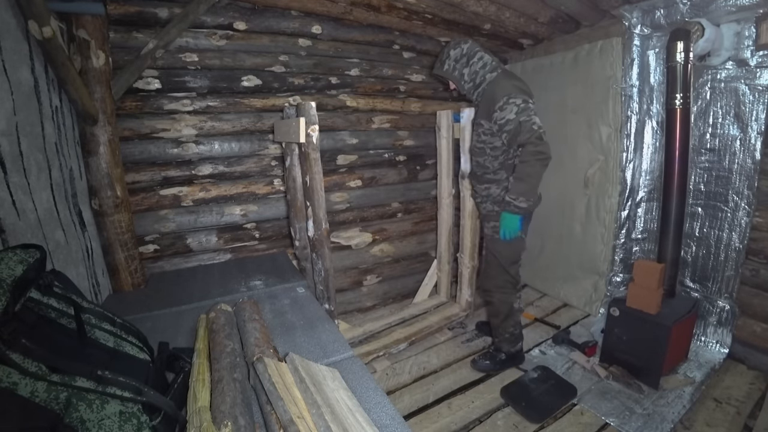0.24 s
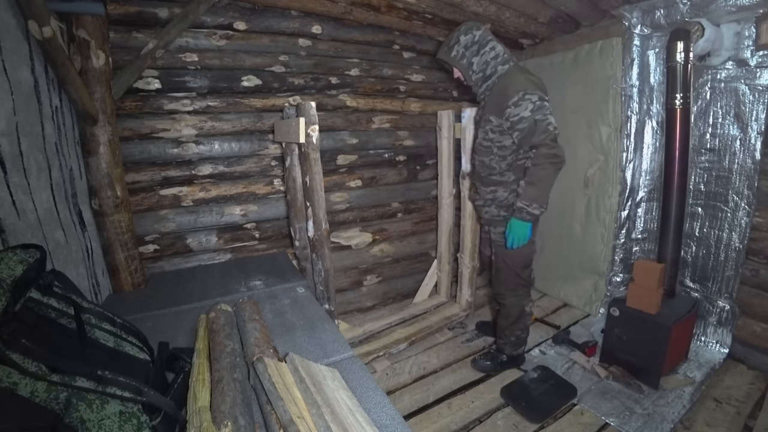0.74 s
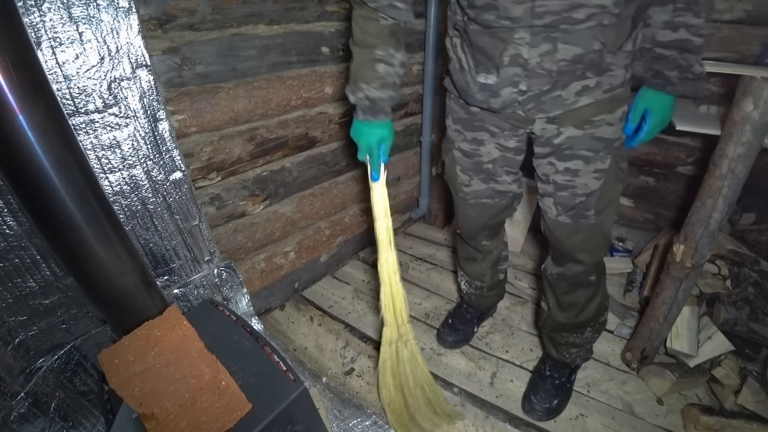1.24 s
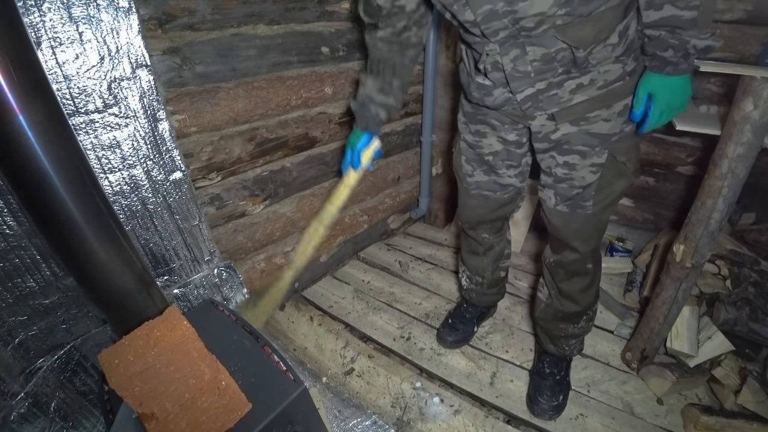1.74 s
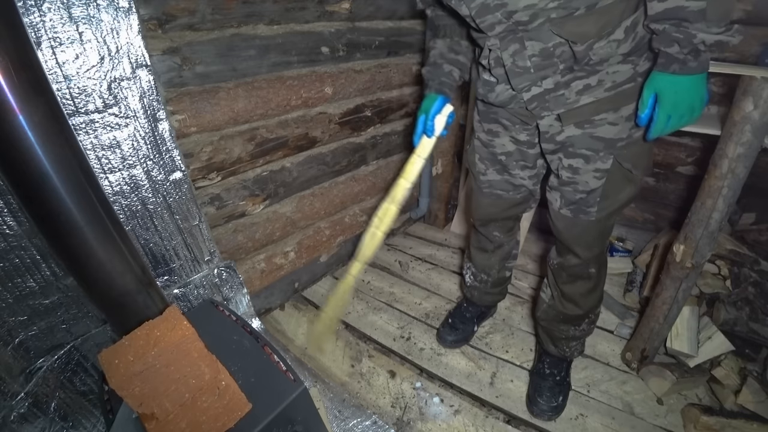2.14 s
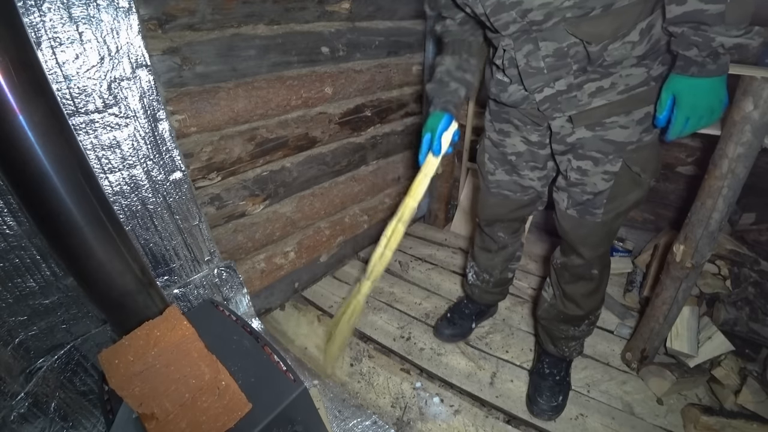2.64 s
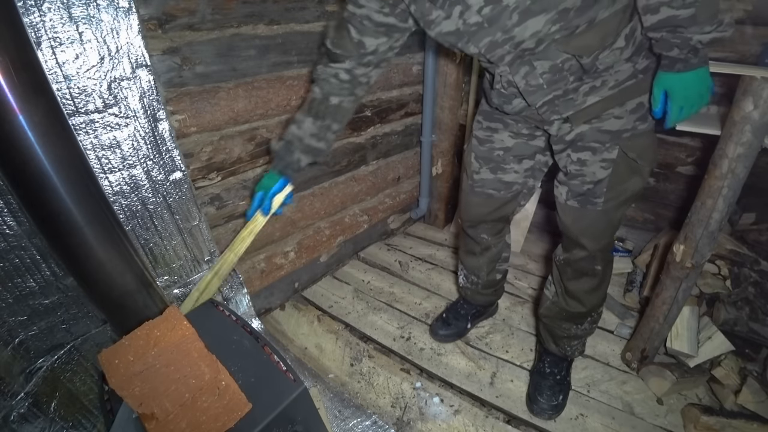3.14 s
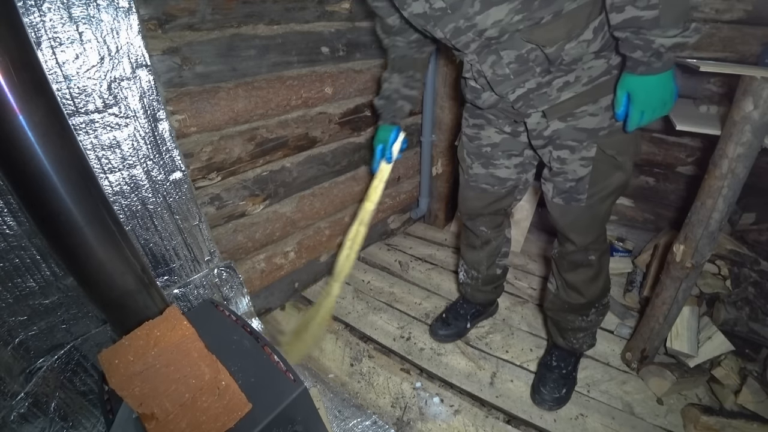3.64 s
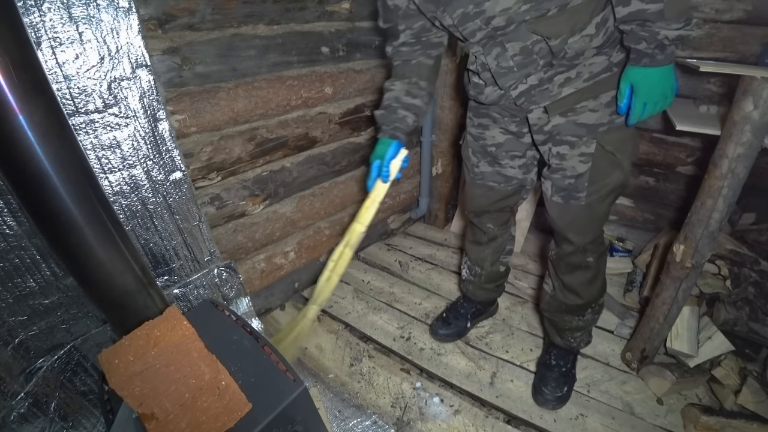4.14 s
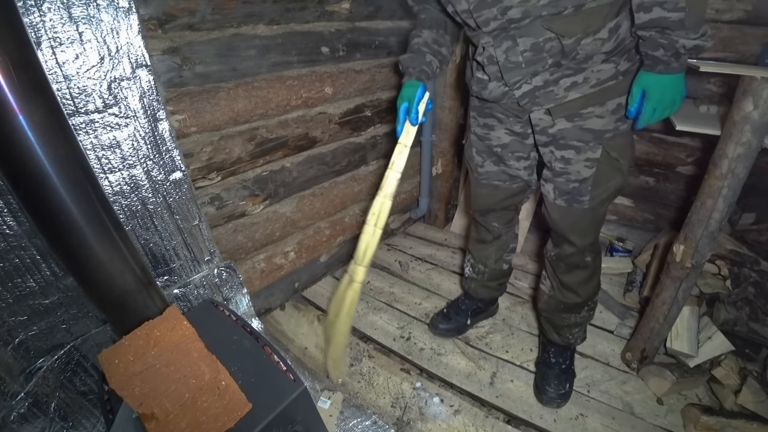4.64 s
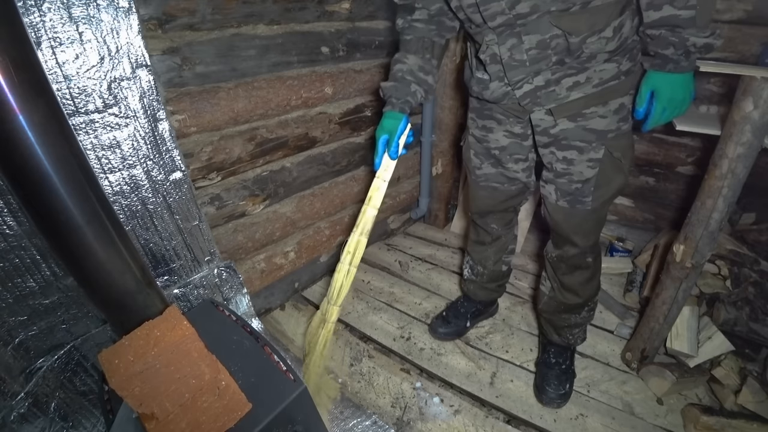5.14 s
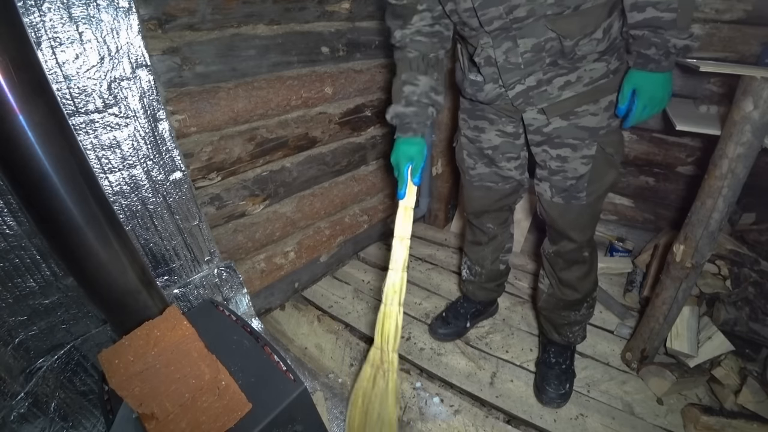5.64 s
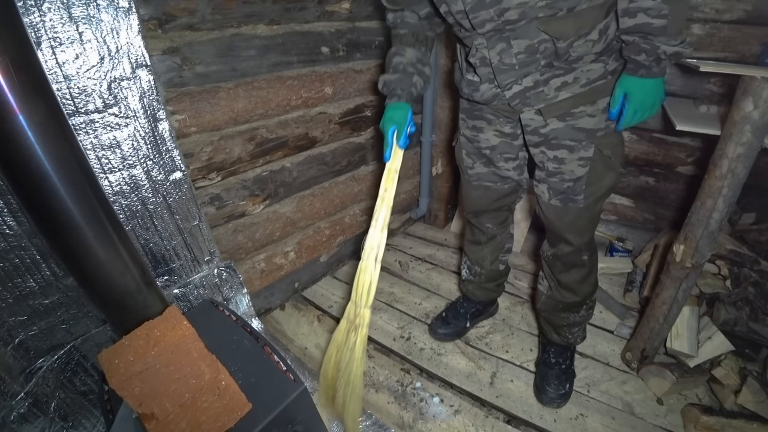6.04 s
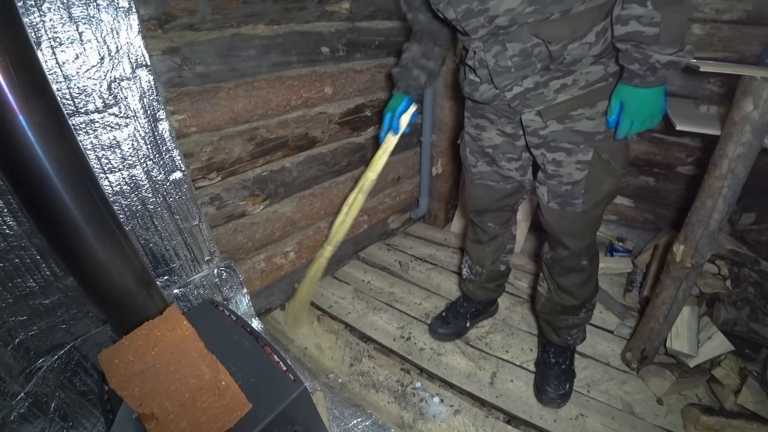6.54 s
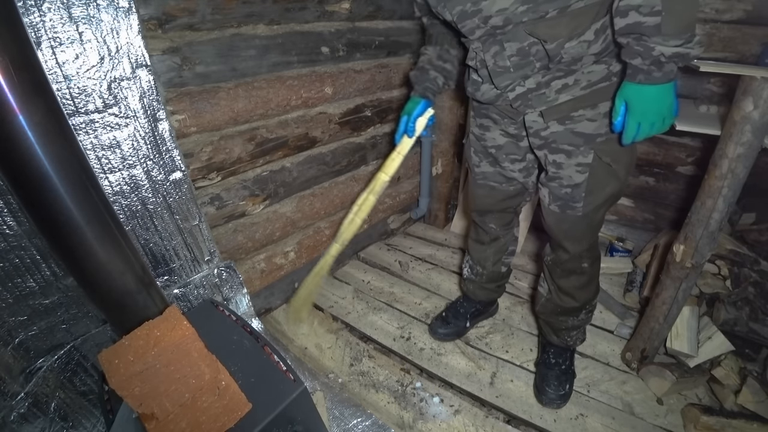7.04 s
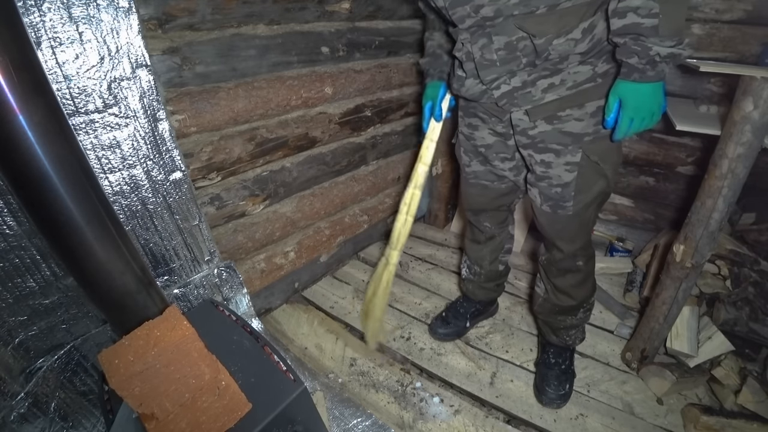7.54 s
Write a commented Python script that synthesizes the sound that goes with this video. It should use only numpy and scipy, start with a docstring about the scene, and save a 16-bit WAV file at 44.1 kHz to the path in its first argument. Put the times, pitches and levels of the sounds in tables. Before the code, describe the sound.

Two dull tray knocks and a boot scuff on planks, then brisk straw broom strokes with small snaps in a quiet log room.

```python
"""In a small log room with a plank floor, over a quiet hush, a boot shoves a tray that knocks twice on the boards.
Then a straw broom sweeps in short strokes; near the end a wood chip is dragged along.
Boot and broom drags are a rain of tiny random slips, heard through straw tips, stalks, dust and rumbling planks.
Thumps and snaps are short dying tones, snaps with a noisy flick; the tray and the chip are sets of ringing
tones, set off by blows or by slips. The walls add a short tail of scattered echoes."""
import sys
import numpy as np
from scipy import signal
from scipy.fft import rfft, irfft
from scipy.io import wavfile

SR = 44100
rng = np.random.default_rng(int(sys.argv[2]) if len(sys.argv) > 2 else 0)


def magnitude_from_level(level_db):
    """Linear magnitude for a level in decibels (20 dB per decade)."""
    exponent = np.asarray(level_db, float) / 20
    return 10 ** exponent


def transcribe(signal):
    """Save signal, clipped to [-1, 1], as a 16-bit WAV file at the path in sys.argv[1]."""
    frames = np.atleast_2d(signal).T
    limited = np.clip(frames, -1, 1)
    pcm = np.round(limited * 32767).astype(np.int16)
    wavfile.write(sys.argv[1], SR, pcm)


N = 343539   # length in samples
BINS_HZ = np.maximum(np.fft.rfftfreq(N, 1 / SR), 1)

# All levels in the tables are relative.
# Tone of the quiet room and the microphone's own noise: (frequency [Hz], level [dB])
HUSH_TONE = [(25, -14.5), (58, -1.5), (130, -9), (250, -1.5), (600, -5), (1500, -8.5), (3300, -10),
             (4600, -6.5), (6300, -16.5), (6900, -11), (8000, -15), (12600, -26), (12900, -46),
             (15600, -57)]
# How alike the hush is on the left and the right: (frequency [Hz], likeness [-1 to 1])
HUSH_LIKENESS = [(60, 0.72), (180, -0.19), (550, -0.49), (1650, -0.49), (4970, 0.34), (15000, 0.57)]
# One list per drag over the boards, first the boot, then the broom:
# (time [s], swish level [dB], pressure as thick-stem level against the swish [dB])
DRAGS = [
    [(0.0, -47.5, 1), (0.14, -40, -5), (0.176, -53, -2.5), (0.19, -42, -3), (0.215, -45.5, -2.5)],
    [(0.3, -62, 8.5), (0.344, -74, 5.5), (0.44, -74, -10.5), (0.465, -62, 7)],
    [(0.55, -54.5, -1), (0.61, -66.5, -8), (0.638, -61, -6.5), (0.7, -99, -7.5)],
    [(0.942, -40.5, -33.5), (0.982, -37, -26.5), (1.046, -34.5, -30.5), (1.078, -36, -8.5),
     (1.168, -31.5, -20.5), (1.172, -28, -18.5), (1.252, -37.5, -8), (1.3, -45.5, -16),
     (1.464, -56.5, -6.5), (1.512, -64.5, -12), (1.67, -62.5, -27), (1.682, -47.5, -21), (1.73, -61, -28)],
    [(1.739, -40.5, -27.5), (1.773, -30, -13.5), (1.895, -27, -17), (1.955, -31, -14), (2.023, -28.5, -23),
     (2.089, -44, -15), (2.233, -58.5, -20.5), (2.32, -84.5, -14.5)],
    [(2.33, -73.5, -16.5), (2.398, -44, -21.5), (2.438, -36, -13.5), (2.492, -24.5, -20.5),
     (2.546, -27, -13.5), (2.6, -28.5, -13), (2.802, -59.5, -16.5), (2.822, -53, -19), (2.93, -91, 3)],
    [(2.945, -64, -17), (2.949, -54.5, -26.5), (2.99, -65, -16)],
    [(3.0, -62.5, -5), (3.028, -40, -18.5), (3.112, -42.5, -10), (3.176, -49, -13.5), (3.198, -61, -2),
     (3.222, -47.5, -14), (3.25, -58.5, -7), (3.264, -47, -3), (3.328, -33, -9.5), (3.34, -33.5, -6),
     (3.53, -27.5, -12), (3.612, -32.5, -19), (3.702, -26.5, -20), (3.726, -25.5, -23), (3.792, -39.5, -19),
     (3.892, -62, -38), (3.93, -89.5, -10)],
    [(4.043, -43.5, -11), (4.073, -28, -16.5), (4.105, -34.5, -10), (4.117, -39, -14.5),
     (4.157, -24.5, -17), (4.367, -34, -9), (4.445, -42, -8), (4.56, -82, -9)],
    [(4.93, -92, -0.5), (4.944, -60, -23), (4.988, -44, -24), (5.04, -38.5, 0), (5.194, -57.5, -6.5),
     (5.218, -47.5, -34), (5.228, -52.5, -20), (5.276, -40, -18.5), (5.486, -88.5, -17.5), (5.5, -85, -11)],
    [(5.638, -45.5, -9.5), (5.642, -38, -9), (5.724, -25, -9.5), (5.838, -25, -16.5), (5.904, -49, -17),
     (5.96, -54.5, -33.5), (6.05, -78, -21.5)],
    [(6.095, -60.5, -6), (6.121, -37.5, -10.5), (6.173, -37.5, -11.5), (6.191, -29, -10.5),
     (6.213, -37.5, -7.5), (6.307, -30.5, -17.5), (6.413, -64, -20), (6.5, -99, -5)],
    [(6.62, -74, -26), (6.652, -47, -7.5), (6.694, -38, -14.5), (6.714, -43, -4), (6.768, -38.5, -23.5),
     (6.862, -37, -4), (7.008, -49.5, -9.5), (7.066, -64, -13.5), (7.102, -59, -16.5), (7.146, -89.5, 19.5),
     (7.18, -97.5, 3)],
    [(7.2, -74, -4), (7.222, -60, -18.5), (7.306, -36, -29.5), (7.474, -35, -6.5), (7.518, -35.5, -10),
     (7.56, -48.5, -11), (7.64, -56.5, -8), (7.758, -60, -15), (7.79, -70, -14)],
]
# What each drag runs over, in the same order:
# (hollow planks [dB], roughness that shakes the stalks [dB], dust [dB])
GROUND = [(0.5, -2.5, 1), (4, -0.5, -4), (1.5, -4, -8.5), (-0.5, 2, 3.5), (0, -0.5, 2), (-1.5, 1, 1),
          (-4, -6, -11), (1.5, 1, -0.5), (-1.5, -0.5, -2), (-5, 1.5, 2), (-10.5, 2, 1), (-18.5, 3.5, 1.5),
          (1.5, -5, 5.5), (-2.5, -3, 3.5)]
# Tone of straw over boards: (frequency [Hz], level [dB])
SWEEP_TONE = [(40, -41.5), (150, -18.5), (300, -4), (450, -16.5), (700, -16), (1500, -12), (2600, -7),
              (3400, -9.5), (3700, -17.5), (4200, -12), (5200, -13.5), (6300, -17.5), (8200, -14),
              (10500, -19.5), (13000, -30), (15600, -37.5)]
# Tones of the floor planks: (frequency [Hz], damping [Hz], level [dB])
PLANK_MODES = [(178, 40, -7.5), (204, 86, 10), (350, 62, 7), (532, 270, 7), (683, 330, -6.5)]
# Boards thumped by boot, tray and broom; the lowest when weight shifts on them:
# (time [s], level [dB], pitch [Hz])
THUMPS = [(0.056, -30, 263), (0.081, -24.5, 265.5), (0.102, -33, 280), (0.125, -37, 271),
          (0.187, -28.5, 267), (0.05, -62.5, 55.6), (0.241, -19, 274), (0.25, -48, 70.3), (1.2, -66, 75),
          (1.78, -64, 80), (2.43, -66, 75), (3.17, -58, 69.9), (3.28, -59.5, 55), (3.4, -56.5, 80.4),
          (3.52, -66.5, 60.2), (5.645, -59.5, 60), (6.95, -68, 75), (0.261, -23.5, 250.2),
          (0.325, -38, 278.7), (0.501, -37.5, 244), (3.498, -32, 229), (3.543, -34.5, 183.7),
          (4.05, -36.5, 528), (4.363, -33.5, 520), (6.655, -45, 190), (6.697, -32.5, 536),
          (6.712, -39, 247), (6.848, -41.5, 184), (7.116, -50.5, 568)]
# The tray's knocks on the boards: (time [s], level [dB])
KNOCKS = [(0.224, -9.5), (0.48, -8)]
# Contacts within each knock, edge first, then the flat blow and rebounds: (time after the blow [s], level [dB])
BOUNCE = [(-.003, -10.5), (0, 0.5), (.007, -8.5), (0.0138, -19), (.07, -42.5)]
# Tones of the tray: (frequency [Hz], level [dB], time to die by 60 dB before extra damping [s])
TRAY_MODES = [(510, -4.5, 0.12), (665, -2.5, 0.15), (734, -1.5, .12), (977, 2.5, 0.17), (1158, 1, .1),
              (1482.5, -4, 0.12), (1216, -7.5, 0.12), (1900, -5, 0.06), (2347, -17.5, 0.21),
              (2600, -10.5, 0.11), (3020, -9, 0.046), (3252, -22, 0.087), (3560, -22.5, 0.11),
              (4400, -15.5, 0.05)]
# Single straws and grit that snap: (time [s], level [dB], pitch [Hz])
SNAPS = [(0.384, -40, 4430), (0.6, -32.5, 4460), (1.1733, -30, 4170), (1.3256, -31, 4650),
         (1.4063, -18, 4640), (1.467, -29, 4100), (1.5429, -33.5, 4530), (1.588, -28.5, 5170),
         (1.63, -38, 4500), (1.6645, -26.5, 4630), (1.675, -26, 2820), (1.6824, -22, 2830),
         (1.6994, -34.5, 3970), (2.337, -25.5, 4300), (2.3754, -39, 4800), (2.8234, -22.5, 4490),
         (2.9514, -35, 4300), (3.002, -25, 1050), (3.024, -18, 5160), (3.036, -18, 2390),
         (3.1044, -17, 2480), (3.13, -17.5, 2990), (3.171, -28, 4500), (3.188, -27, 1660),
         (4.0734, -22, 4730), (4.1385, -24, 4530), (4.1599, -27, 5000), (4.1895, -6.5, 4870),
         (4.2024, -21, 4320), (4.4372, -13.5, 4470), (4.6297, -40.5, 4160), (5.1645, -24.5, 4400),
         (5.2131, -33, 4610), (5.267, -13.5, 4620), (6.05, -42, 4400), (6.0956, -32, 5110),
         (6.584, -38, 4700), (6.6334, -49, 4500), (7.1044, -32.5, 1660), (7.599, -47, 4240),
         (7.628, -24, 6650), (7.66, -26, 4830), (7.7334, -30, 3120), (7.7588, -49.5, 4420)]
# Rise and fall of a chip dragged by the straws: (time [s], level [dB])
CHIP_DRAG = [(6.775, -55), (6.813, -51.5), (6.863, -29.5), (6.915, -41.5), (6.927, -35.5), (6.97, -58.5)]
# Tones of the chip: (frequency [Hz], level [dB], time to die by 60 dB [s])
CHIP_MODES = [(1430, 1, 0.048), (1536, 2.5, 0.037), (1873, 0, 0.014), (2820, -8, 0.019)]
# How far the left microphone port leads the right: (frequency [Hz], phase [radians])
PORT_LEAD = [(60, -.22), (125, -.33), (250, -.48), (500, -.72), (1100, -.75), (2100, -.5), (3800, -.2),
             (6100, .2), (9000, .4), (12500, .8)]


def rms_one(x):
    """Scales a sound to an average strength (rms) of 1."""
    return x / np.sqrt(np.mean(x ** 2) + 1e-20)


def at_hz(points, hz):
    """Reads a curve at any frequency, with straight lines over log frequency."""
    f, v = np.transpose(points)
    return np.interp(np.log(hz), np.log(np.maximum(f, 1)), v)


def drift(rate_hz):
    """Slow random wandering of spread 1: noise smoothed twice."""
    r = np.exp(-2 * np.pi * rate_hz / SR)
    noise = rng.standard_normal(N + SR)
    return rms_one(signal.lfilter([1], [1, -2 * r, r * r], noise)[SR:])   # the first second settles the filter


def colour(x, spectrum):
    """Minimum-phase filter from a spectrum: nothing sounds before its cause."""
    size = 8192
    hz = np.maximum(np.fft.rfftfreq(size, 1 / SR), 1)
    cepstrum = irfft(np.log(magnitude_from_level(at_hz(spectrum, hz))))
    cepstrum[1:size // 2] *= 2   # fold the past onto the future
    cepstrum[size // 2 + 1:] = 0
    response = irfft(np.exp(rfft(cepstrum)))[:size // 2]
    return signal.oaconvolve(x, response[None], axes=-1)[:, :N]


def bandpass(x, order, low_hz, high_hz):
    """Keeps only the sound between two frequencies."""
    return signal.sosfilt(signal.butter(order, [low_hz, high_hz], "band", fs=SR, output="sos"), x)


def band(x, low_hz, high_hz):
    """One frequency band, brought to strength 1."""
    return rms_one(bandpass(x, 3, low_hz, high_hz))


def ring(clicks, hz, t60):
    """A unit click sets a sine ringing from about height 1; it dies by 60 dB in t60 seconds."""
    r, w = magnitude_from_level(-60 / (t60 * SR)), 2 * np.pi * hz / SR
    return signal.lfilter([0, np.sin(w)], [1, -2 * r * np.cos(w), r * r], clicks + 1e-18)   # avoids slow tiny numbers


def fading(clicks, t60):
    """Each click starts a level that dies by 60 dB in t60 seconds."""
    return signal.lfilter([1], [1, -magnitude_from_level(-60 / (t60 * SR))], clicks + 1e-18)


def clicks_at(events, gain_db):
    """One-sample clicks at the listed times and levels."""
    clicks = np.zeros(N)
    clicks[[round(row[0] * SR) for row in events]] = magnitude_from_level(np.array(events)[:, 1] + gain_db)
    return clicks


def slips(per_s, spread_db, clump_db, clump_hz):
    """Random slips, mostly small, in clumps; the power stays near 1 however sparse they come."""
    born = rng.random(N) < per_s / SR
    sizes = magnitude_from_level(spread_db * np.minimum(rng.exponential(1, N), 4) + clump_db * drift(clump_hz))
    return born * rms_one(sizes) * np.sqrt(SR / per_s) * rng.choice([-1, 1], N)


def pings(rows, cycles, rise_cycles, gain_db):
    """Each row swells and dies at its own pitch, falling 60 dB over the given number of cycles."""
    out = np.zeros(N)
    for s, db, hz in rows:
        start = round(s * SR)
        turns = np.arange(min(int(cycles / hz * SR), N - start)) * hz / SR
        rise = (1 - np.exp(-turns / rise_cycles)) ** 2
        fall = magnitude_from_level(db + gain_db - 60 * turns / cycles)
        out[start:][:len(turns)] += fall * rise * np.sin(2 * np.pi * turns)
    return out


def hush():
    """The quiet room and the microphone's own noise: coloured noise, more or less alike on the two sides."""
    mid_db = -73.5   # level of the part common to both sides
    mid, side = rfft(colour(rng.standard_normal((2, N)), HUSH_TONE))
    alike = np.clip(at_hz(HUSH_LIKENESS, BINS_HZ), -.99, .99)
    side = irfft(side * np.sqrt((1 - alike) / (1 + alike)), N)
    mid = irfft(mid, N)
    return magnitude_from_level(mid_db) / np.std(mid) * (mid + side * [[1], [-1]])


def stroke_controls():
    """Joins the drags, nearly silent between them; swish, pressure and ground set the level of every layer."""
    landing_s, leaving_s = 0.0077, 0.003   # the straws meet the floor one after another
    rows = []
    for table, ground in zip(DRAGS, GROUND):
        first, last = table[0], table[-1]
        before = (first[0] - landing_s, -80, first[2])
        after = (last[0] + leaving_s, -100, last[2])
        rows += [(*row, *ground) for row in [before, *table, after]]
    s, *columns = np.transpose(rows)
    swish, press, hollow, rough, dusty = [np.interp(np.arange(N) / SR, s, c) for c in columns]
    # pressing harder brings in the stalks, the planks most of all; the dust hardly changes
    stalks_db = -1.5 + rough + 0.37 * press
    planks_db = -8.5 + hollow + 0.99 * press - 0.17 * swish
    dust_db = -8.5 + dusty + 0.0073 * press - 0.025 * swish
    return swish, stalks_db, press, planks_db, dust_db


def straws(rain, cycles, catch_db, catch_hz):
    """Each slip is dealt to one of 18 straw pitches, which rings; each catches and lets go in its own time."""
    pitches, dealt, out = np.geomspace(900, 12000, 18), rng.integers(0, 18, N), 0
    for k, hz in enumerate(pitches):
        catch = np.interp(np.arange(N) * catch_hz / SR, np.arange(600), rng.standard_normal(600))
        own_slips = rain * (dealt == k) * magnitude_from_level(catch_db * catch)
        out = out + rms_one(ring(own_slips, hz, cycles / hz)) * np.sqrt(hz)
    return rms_one(out)


def grit(swish_db):
    """Lone grains skip from under the straws; they fade less than the swish, so a light broom shows them best."""
    grains = slips(140, spread_db=1.0, clump_db=4.0, clump_hz=12)
    return magnitude_from_level(-40.5 + 0.55 * swish_db) * band(colour(grains[None], SWEEP_TONE)[0], 1200, 12000)


def broom():
    """One rain of slips is heard through tips, stalks and dust; heavier slips shake the planks (boot drags too)."""
    tips_db, stalks_db, stems_db, planks_db, dust_db = stroke_controls()
    per_s = np.clip(9000 * magnitude_from_level(0.72 * (tips_db + 31.0)), 2500, 16000)   # a quiet swish has fewer slips
    rain = slips(per_s, spread_db=2.8, clump_db=1.8, clump_hz=60)
    rain = rain + 0.42 * straws(rain, cycles=16.0, catch_db=2.5, catch_hz=35.08)
    rain = rms_one(colour(rain[None], SWEEP_TONE)[0])

    heavy = slips(500, spread_db=3.0, clump_db=3.5, clump_hz=25)
    boards = rms_one(sum(magnitude_from_level(db) * rms_one(ring(heavy, hz, 5.4 / damping)) for hz, damping, db in PLANK_MODES))
    smooth = rms_one(colour(rng.standard_normal((1, N)), SWEEP_TONE)[0])   # fine dust hisses smoothly

    tips = band(rain, 3816, 5346)
    stalks = magnitude_from_level(stalks_db + 0.69 * drift(5)) * band(rain, 1600, 3450)
    stems = magnitude_from_level(stems_db + 0.78 * drift(3.7)) * band(rain + 0.43 * boards, 530, 1285)
    dust = magnitude_from_level(dust_db + 1.3 * drift(10)) * band(rain + smooth, 6100, 15000)
    planks = magnitude_from_level(planks_db) * band(boards + 0.52 * band(rain, 120, 440), 160, 570)
    return grit(tips_db) + magnitude_from_level(tips_db) * (tips + stalks + stems + dust + planks)


def room(x):
    """Log walls: a stereo tail of scattered echoes above the bass, made of dying noise."""
    t60_s, level_db, bass_cut_hz = 0.13, -8.5, 340
    t = np.arange(int(.4 * SR)) / SR
    tail = rng.standard_normal((2, len(t))) * magnitude_from_level(-60 * t / t60_s) * (t > .003)   # first echo after 3 ms
    tail = signal.sosfilt(signal.butter(2, bass_cut_hz, "high", fs=SR, output="sos"), tail)
    tail = tail / np.sqrt(np.sum(tail ** 2) / 2)
    return magnitude_from_level(level_db) * signal.oaconvolve(x[None], tail, axes=-1)[:, :N]


def thumps():
    """A thumped board gives a soft-edged low tone that dies within a few cycles."""
    return pings(THUMPS, cycles=13.3, rise_cycles=1.1, gain_db=11.5)


def blows():
    """Every knock lands in the same short run of contacts."""
    return [(s + after, db + bounce_db) for s, db in KNOCKS for after, bounce_db in BOUNCE]


def struck(events, modes, gain_db, scatter_db, contact_s, damping):
    """Each blow is a rough contact of a few ms that strikes every mode with a strength of its own."""
    chance = rng.standard_normal((len(events), len(modes)))
    fade = np.exp(-1 / (contact_s * SR))
    rough = rng.standard_normal(N) * np.sqrt(1 - fade ** 2)
    out = np.zeros(N)
    for k, (hz, db, t60) in enumerate(modes):
        clicks = clicks_at(events, db + gain_db + scatter_db * chance[:, k])
        contact = signal.lfilter([1], [1, -fade], clicks + 1e-18) * rough
        out += ring(contact, hz, min(t60 / damping, .06))   # wood is dry: nothing rings long
    return bandpass(out, 3, 520, 5500)


def rattle(t60, gain_db):
    """The tray's loose sheet buzzes after each blow: noise that dies."""
    return fading(clicks_at(blows(), gain_db), t60) * band(rng.standard_normal(N), 680, 4800)


def tray():
    """The tray knocks on the boards: its body rings, its loose sheet buzzes, and the treble is dulled."""
    body = struck(blows(), TRAY_MODES, gain_db=-12.0, scatter_db=2.5, contact_s=0.0026, damping=1.5)
    knocks = body + rattle(t60=0.11, gain_db=-16.5)
    return signal.sosfilt(signal.butter(4, 6500, fs=SR, output="sos"), knocks)   # a dull, thick body


def snaps():
    """A dry, broad flick and a short scratch after it, coloured like the sweep, plus a ring at its own pitch."""
    clicks = clicks_at(SNAPS, gain_db=9.5)
    scratch = magnitude_from_level(-17.0) * fading(clicks, t60=.05) * rng.standard_normal(N)
    flick = bandpass(colour((clicks + scratch)[None], SWEEP_TONE)[0], 2, 1900, 14000)
    return flick + pings(SNAPS, cycles=14, rise_cycles=.5, gain_db=-5)


def chip():
    """The chip stutters over the grain of the wood, and every slip rings it."""
    s, db = np.transpose(CHIP_DRAG)
    drag = magnitude_from_level(np.interp(np.arange(N) / SR, s, db, -120, -120))   # as good as silent outside the drag
    stutter = slips(1600, spread_db=0.0, clump_db=3.0, clump_hz=38.8)
    ringing = sum(magnitude_from_level(mode_db) * ring(stutter, hz, t60) for hz, mode_db, t60 in CHIP_MODES)
    return drag * band(ringing, 900, 4500)


def two_ports(near):
    """Two close microphone ports hear the same sound with shifted phase, the left a touch louder."""
    lead = np.exp(.5j * at_hz(PORT_LEAD, BINS_HZ) * [[1], [-1]])   # half the lead on each side
    return irfft(rfft(near) * lead, N) * magnitude_from_level([[.15], [-.15]])


def scene():
    """Adds the sources near the microphone, their echoes and the hush."""
    near = broom() + thumps() + tray() + snaps() + chip()
    return two_ports(near) + room(near) + hush()


def top_cut(x):
    """Nothing passes above the cut-off."""
    return signal.sosfilt(signal.butter(12, 15740, fs=SR, output="sos"), x)


def record(dry):
    """The small microphone: its port makes a shallow dip in the tone, and the top is cut."""
    dip_hz, dip_width_hz, dip_share = 3530, 240, 0.18
    notched = signal.lfilter(*signal.iirnotch(dip_hz, dip_hz / dip_width_hz, fs=SR), dry)
    mix = dry + dip_share * (notched - dry)
    mix = signal.sosfilt(signal.cheby2(12, 60, 16200, fs=SR, output="sos"), mix)   # 60 dB down from 16200 Hz up
    return top_cut(mix)


dry = scene()
out = record(dry)
transcribe(out)
```